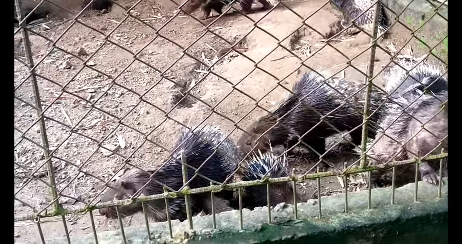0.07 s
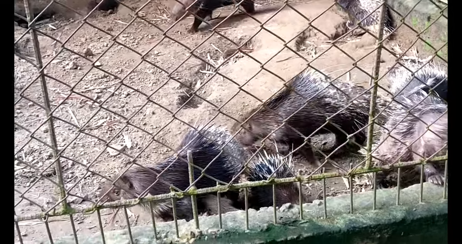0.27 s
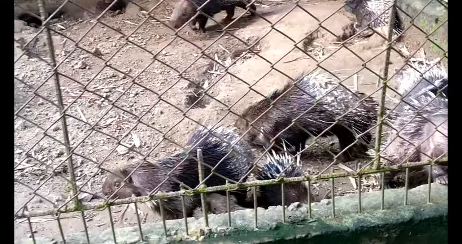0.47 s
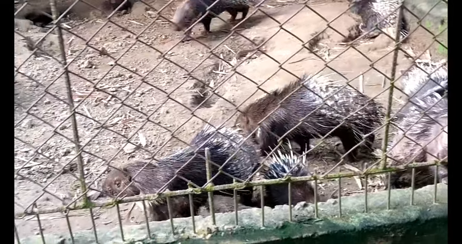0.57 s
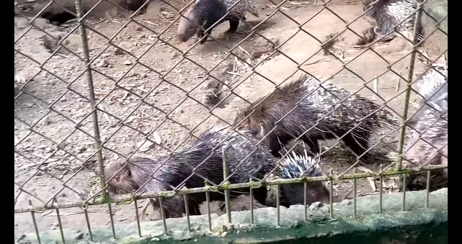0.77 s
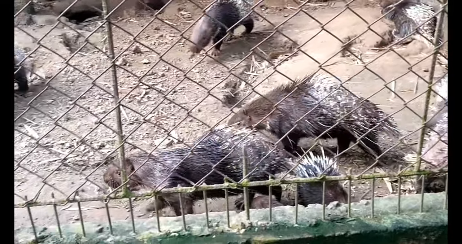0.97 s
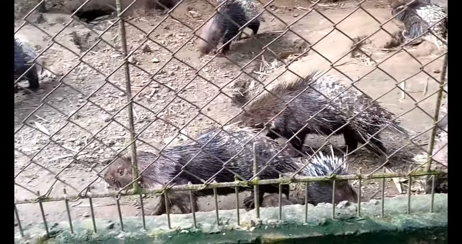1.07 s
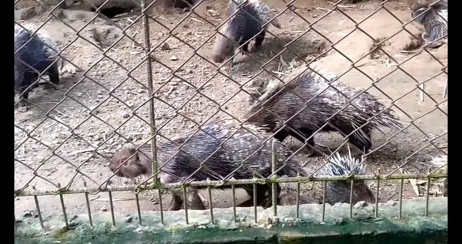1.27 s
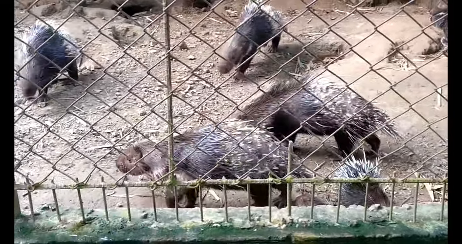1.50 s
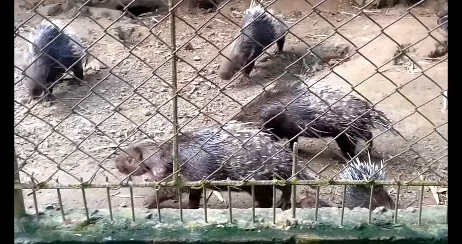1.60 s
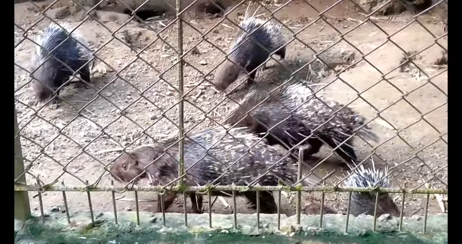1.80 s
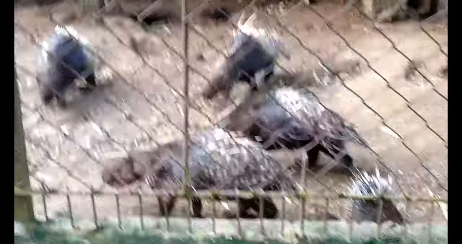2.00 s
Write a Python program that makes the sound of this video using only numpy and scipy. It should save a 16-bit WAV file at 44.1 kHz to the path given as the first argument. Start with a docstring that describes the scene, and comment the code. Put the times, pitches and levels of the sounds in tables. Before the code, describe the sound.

After a brief light rustle, a nasal, raspy porcupine whine dips, rises and falls; crisp quill clacks thicken midway and outlast it, with faint scuffs and thin hiss, heard close in stereo in a quiet outdoor enclosure.

```python
"""A porcupine behind a wire fence gives one long, wavering whine: harmonics and a rasp filtered by throat and nose.
The group shuffles over dry ground: quills rustle and clack, as noise in contact envelopes, coloured by their ring.
A few feet scuff soil and snap litter (decaying noise bursts); a thin high hiss of narrow-band noise hangs above.
Low noise and a faint far drone make the quiet yard. The left microphone gets more treble than the right."""
import sys
import numpy as np
from scipy import signal
from scipy.fft import rfft, irfft
from scipy.io import wavfile
from scipy.ndimage import uniform_filter1d

SR = 44100
rng = np.random.default_rng(int(sys.argv[2]) if len(sys.argv) > 2 else 0)


def unload_audio(sound):
    """Save the sound as a 16-bit wav file, at the path given as the first command line argument."""
    columns = np.transpose(np.atleast_2d(sound))
    # keep every value between -1 and 1, then stretch to whole-number steps
    steps = np.round(np.clip(columns, -1, 1) * 32767)
    wavfile.write(sys.argv[1], SR, steps.astype(np.int16))


N = 90404


def undb(db):
    """Logarithmic level: 20 dB is a factor of ten in amplitude."""
    return 10 ** (np.asarray(db) / 20)


def unit(x):
    """Normalisation to a root-mean-square value of 1."""
    return x / np.sqrt(np.mean(x ** 2))


def noise():
    """White noise: equal power at all frequencies."""
    return rng.standard_normal(N)


def curve(table, axis=1):
    """Linear interpolation of one table column in time."""
    rows = np.array(table)
    return np.interp(np.arange(N) / SR, rows[:, 0], rows[:, axis])


def walk(hz):
    """Band-limited random modulation: noise low-passed at hz, with RMS 1."""
    low_pass = signal.butter(2, hz, fs=SR, output="sos")
    return unit(signal.sosfilt(low_pass, noise()))


def colour(x, points, keep_level=False):
    """Minimum-phase filtering: the gain through (f/Hz, level/dB) points fixes a causal response."""
    hz, db = np.array(points).T
    size = 2048
    bins_hz = np.maximum(np.fft.rfftfreq(size, 1 / SR), 1)
    gain = undb(np.interp(np.log(bins_hz), np.log(hz), db))
    if keep_level:
        gain = unit(gain)  # white noise then keeps its power
    # folding the cepstrum onto positive time gives minimum phase
    cepstrum = irfft(np.log(gain))
    cepstrum[1:size // 2] *= 2
    cepstrum[size // 2 + 1:] = 0
    response = irfft(np.exp(rfft(cepstrum)))
    return signal.fftconvolve(x, response)[:N]


def strikes(rows, contact_s=0.00098):
    """Impact excitation: a linear rise over the contact time up to the peak, then exponential decay."""
    t = np.arange(N) / SR
    total = 0
    for at, db, decay in rows:
        rise = np.clip((t - at) / contact_s + 1, 0, 1)
        fall = np.exp(-np.maximum(t - at, 0) / decay)
        total = total + undb(db) * rise * fall
    return total


# spectral shape of the yard's background noise: f/Hz, relative level/dB
YARD_SPECTRUM = [(25, -43), (60, -12), (100, 4), (160, -3), (240, -10), (400, -32), (600, -4), (900, -8.5),
                 (2000, -25.5), (5000, -16), (14000, -16)]
# faint low drone in the distance: t/s, level/dB
DRONE_LEVEL = [(0, -64.5), (.08, -71.5), (.2, -76.5), (.7, -79), (1.2, -87), (1.56, -71.5), (1.67, -81.5),
               (1.75, -75), (1.85, -77.5), (2.05, -82.5)]
# spectral shape of the far drone: f/Hz, relative level/dB
DRONE_SPECTRUM = [(80, -20), (160, -5), (220, 5.5), (280, -2.5), (360, -13), (600, -22.5), (2000, -65.5)]


def yard(level_db=-76.5, side_db=-13):
    """Diffuse background: mid and weak side noise give high coherence between sides; the drone is common."""
    mid, side = (colour(noise(), YARD_SPECTRUM, True) for _ in range(2))
    drone = undb(curve(DRONE_LEVEL)) * colour(noise(), DRONE_SPECTRUM, True)
    opposite = np.array([[1], [-1]])
    return undb(level_db) * (mid + undb(side_db) * side * opposite) + drone


# hard clacks of quills: t/s, peak level/dB of the envelope, decay/s
CLACKS = [(.0228, -32.5, 0.00083), (.1215, -35, 0.0034), (.382, -23, 0.0022), (.400, -33, 0.0028),
          (.440, -33, .003), (.498, -30.5, 0.0025), (.518, -47, .001), (.5375, -24, 0.0022),
          (.831, -25.5, 0.0034), (.8355, -20.5, 0.0038), (.8395, -30, 0.0049), (.8465, -23, 0.0019),
          (.857, -25.5, 0.0035), (.903, -31, 0.0018), (.930, -36, 0.0014), (.958, -26, 0.0053),
          (.990, -24, 0.0014), (1.016, -35, 0.0019), (1.153, -39, 0.0023), (1.1905, -21.5, 0.0028),
          (1.252, -24, 0.0044), (1.286, -51, .004), (1.3135, -24, 0.0015), (1.324, -24, .005),
          (1.336, -35.5, 0.0064), (1.419, -35.5, 0.0058), (1.500, -24, 0.0024), (1.538, -35, .003),
          (1.5605, -36.5, 0.0013), (1.577, -29, 0.0035), (1.590, -28.5, 0.0035), (1.637, -22.5, 0.0032),
          (1.657, -33.5, 0.0031), (1.689, -34, 0.011), (1.762, -36.5, 0.0086), (1.7972, -27.5, 0.0025),
          (1.845, -40.5, 0.0018), (1.943, -51.5, .005), (1.985, -51, .007), (2.014, -46.5, 0.0042),
          (2.03, -50.5, 0.0054)]
# ring of a quill: f/Hz, relative level/dB
QUILL_RING = [(300, -44.5), (2000, -29), (3000, -19), (3900, -17.5), (5400, -11.5), (6400, -1), (7100, 7),
              (7900, 8), (8900, -5.5), (10500, -14), (14000, -18.5)]
# rustle of the coats before the ground reflection: t/s, level/dB
RUSTLE_LEVEL = [(0, -50.5), (.05, -60), (.10, -46.5), (.19, -53.5), (.33, -52.5), (.40, -46), (.51, -49.5),
                (.60, -56), (.78, -61), (.84, -40), (.97, -42.5), (1.04, -51), (1.12, -40), (1.24, -33.5),
                (1.34, -40), (1.38, -41), (1.48, -46), (1.535, -49), (1.61, -42.5), (1.66, -42),
                (1.75, -47), (1.84, -47), (1.93, -63.5), (2.05, -57)]
# spectral shape of the rustle: f/Hz, relative level/dB
RUSTLE_SPECTRUM = [(300, -57), (1000, -32), (2200, -33), (3900, -8), (5500, -7.5), (7200, 5), (8300, 0.5),
                   (10000, -8), (12000, -11.5), (14000, -15)]
GRAINS_PER_S, GRAIN_SPREAD_DB, GRAIN_DECAY_S = 1400, -1.5, 0.00055
CLUMP_DB, CLUMP_HZ = 1, 110  # random swell that gathers the small touches in clumps
BOUNCE_S, BOUNCE_DB = 0.003, -5.5  # reflection from the ground


def quills():
    """Granular excitation: random touches and hard clacks ring the quills, in two views of the same contacts."""
    touched = rng.random(N) < GRAINS_PER_S / SR
    spread = np.minimum(rng.exponential(size=N), 4)
    touches = touched * undb(GRAIN_SPREAD_DB * spread)
    touches = touches * undb(CLUMP_DB * walk(CLUMP_HZ))
    # a one-pole filter gives each touch its exponential decay
    pole = np.exp(-1 / (GRAIN_DECAY_S * SR))
    grains = unit(signal.lfilter([1], [1, -pole], touches)) * undb(curve(RUSTLE_LEVEL))
    clacks = strikes(CLACKS)
    t = np.arange(N) / SR
    views = []
    for _ in range(2):
        rustle = colour(grains * noise(), RUSTLE_SPECTRUM, True)
        direct = rustle + colour(clacks * noise(), QUILL_RING, True)
        bounce = np.interp(t - BOUNCE_S, t, direct, left=0)
        views.append(direct + undb(BOUNCE_DB) * bounce)
    return np.array(views)


# thin hiss before its flutter: t/s, level/dB
HISS_LEVEL = [(0, -84), (.2, -51.5), (.38, -45), (.68, -51), (.95, -51), (1.2, -57.5), (1.45, -46),
              (1.56, -56.5), (1.8, -67.5), (2.05, -82.5)]
# spectral shape of the hiss, with its peak near 7 kHz: f/Hz, relative level/dB
HISS_SPECTRUM = [(3000, -20.5), (5600, -29), (6400, -15), (7000, -1), (7700, -7.5), (8500, -42),
                 (10000, -26.5), (14000, -31)]


def hiss(flutter_db=2.5):
    """Narrow-band noise under random amplitude modulation, in two incoherent views with a common level."""
    level = undb(curve(HISS_LEVEL) + flutter_db * walk(120))
    return np.array([colour(level * noise(), HISS_SPECTRUM, True) for _ in range(2)])


# fundamental of the whine before jitter: t/s, f/Hz
PITCH = [(0.22, 837.4), (0.28, 721.4), (0.33, 571.6), (0.348, 593), (0.366, 590), (0.374, 606.4),
         (0.42, 495), (0.456, 489), (0.46, 483), (0.47, 416.1), (0.484, 347.9), (0.488, 346.6), (0.5, 375),
         (0.538, 445.4), (0.542, 450), (0.554, 434.7), (0.582, 395), (0.586, 388), (0.618, 451.6),
         (0.64, 493), (0.672, 493.3), (0.704, 561), (0.74, 609.7), (0.808, 661.3), (0.838, 637.7),
         (0.88, 599.4), (0.92, 633.6), (0.93, 640), (0.952, 584.6), (0.97, 558), (0.978, 520),
         (1.006, 403.0), (1.042, 476), (1.056, 502), (1.1, 560.3), (1.146, 530.4), (1.178, 551),
         (1.208, 529.6), (1.29, 532.7), (1.318, 464.9), (1.35, 383), (1.398, 364.4), (1.448, 387.7),
         (1.47, 367.7), (1.48, 337.7), (1.51, 233.6)]
# vocal effort before the throat: t/s, relative level/dB, tilt/(dB per octave of harmonics), nasal ring level/dB
EFFORT = [(0.228, -31.0, 1, -8), (0.255, -27.5, 0.2, -0.5), (0.3, -29.5, -1.7, 7.0),
          (0.33, -37.5, -0.5, -3), (0.37, -36, -3.6, 6), (0.42, -37.5, -2, 8), (0.47, -36, -1.9, -2),
          (0.51, -38, -1.9, 4), (0.545, -36, -5.5, -1.0), (0.585, -39, 0, -6), (0.63, -36, -6, 2),
          (0.69, -41.0, -3.5, 1), (0.75, -33.5, -0.5, -3.5), (0.82, -30.5, 1.2, 6.0), (0.88, -33, -0.8, 14),
          (0.935, -30.5, -3.2, 15.5), (0.975, -41, 1, -11), (1.0, -36, -1.1, -30), (1.06, -38.0, -1.5, -13),
          (1.15, -39, 0.5, -14), (1.25, -37, 2.6, 6.5), (1.32, -37.0, 1.95, 1.5), (1.39, -40.5, -0.56, 16),
          (1.45, -38, 0.4, -2), (1.495, -36.5, -5, 11)]
# hoarseness, scaling both roughness and rasp: t/s, relative level/dB
HOARSENESS = [(.22, -7), (.30, 2), (.45, 1), (.58, -9), (.74, -9), (.86, -3.5), (.96, 10), (1.04, -7),
              (1.15, 7), (1.27, 9), (1.34, 0.5), (1.41, -12), (1.50, 14)]
# resonances of throat and nose: f/Hz, level/dB
THROAT = [(120, -5.5), (300.0, -3), (400.0, 1), (550.0, -9), (700.0, -8.5), (820.0, 2.5), (1080.0, -0.5),
          (1350.0, -9.5), (1600.0, -5), (1900.0, -8.5), (2300.0, -11), (2620.0, -11.5), (3100.0, -23.5),
          (3800.0, -20), (5000.0, -27.5), (7000.0, -21), (10000, -65)]
# spectral shape of rasp and pop: f/Hz, relative level/dB
RASP_SPECTRUM = [(200, -64), (600, -32), (950, 3), (1400, -2), (1900, 2), (2700, -4), (3400, -12.5),
                 (6000, -10.5), (10000, -45)]
JITTER, SHIMMER_DB, RASP_DB = 0.00294, 0.54, -17  # jitter as a fraction of the fundamental
NASAL_HZ, NASAL_WIDTH_HZ = 2843, 366
CRY_START_S, CRY_END_S, ATTACK_S, RELEASE_S = .2205, 1.511, 0.0023, 0.015
CATCH_S, CATCH_DB, CATCH_DECAY_S = .215, -36.5, 0.0036  # a small pop just before the tone
WANDER_DB = 2  # slow drift of the upper harmonics
BLUR_DB, BLUR_HZ = -3.5, 2800  # roughness of the harmonics and where it sets in


def whine():
    """Source-filter voice: harmonics, rougher with frequency, and a rasp pulsing each cycle, shaped by resonances."""
    t = np.arange(N) / SR
    hz = uniform_filter1d(curve(PITCH), size=400) * (1 + JITTER * walk(77))
    phase = 2 * np.pi * np.cumsum(hz) / SR
    tilt_db, nasal_db = curve(EFFORT, axis=2), curve(EFFORT, axis=3)
    hoarse = undb(curve(HOARSENESS))
    tone = 0
    for k in np.arange(1, 15):  # harmonic number
        nasal = np.exp(-((k * hz - NASAL_HZ) / NASAL_WIDTH_HZ) ** 2)
        db = tilt_db * np.log2(k) + nasal_db * nasal
        # the fundamental does not drift; from the fourth harmonic up the drift is full
        drift = undb(WANDER_DB * min(np.log2(k) / 2, 1) * walk(7.9))
        blur = hoarse * undb(BLUR_DB) / (1 + (BLUR_HZ / (k * hz)) ** 4)
        # complex noise blurs amplitude and phase; the divisor keeps the mean power
        rough = (1 + blur * (walk(87) + 1j * walk(130))) / np.sqrt(1 + 2 * blur ** 2)
        tone = tone + undb(db) * drift * np.real(rough * np.exp(1j * k * phase))
    attack = np.clip((t - CRY_START_S) / ATTACK_S, 0, 1)
    release = np.clip((CRY_END_S - t) / RELEASE_S, 0, 1)
    level = attack * release * undb(curve(EFFORT) + SHIMMER_DB * walk(46))
    cycle_pulse = (.5 + .5 * np.cos(phase)) ** 2
    rasp = level * hoarse * undb(RASP_DB + tilt_db) * cycle_pulse
    pop = strikes([(CATCH_S, CATCH_DB, CATCH_DECAY_S)])
    return colour(tone * level, THROAT) + colour((rasp + pop) * noise(), RASP_SPECTRUM, True)


# scuffs of feet before the high-pass: t/s, peak level/dB of the envelope, decay/s
SCUFFS = [(.381, -44.5, 0.0068), (.439, -39.5, 0.0055), (.538, -40, 0.0071), (.955, -37, 0.0089),
          (1.499, -41.5, 0.012), (1.559, -58, 0.0081), (1.634, -63.5, 0.0067)]
# spectral shape of a scuff on soil before the high-pass: f/Hz, relative level/dB
SOIL_SPECTRUM = [(80, -36), (160, -13), (260, -6), (500, -8), (1000, -9), (2000, -9.5), (3500, -7.5),
                 (7000, -30)]
# sharp snaps of dry litter underfoot: t/s, peak level/dB of the envelope, decay/s
SNAPS = [(.440, -36.5, .002), (.538, -47, 0.0014), (.958, -35.5, 0.00099), (1.501, -48, 0.0015),
         (1.561, -41.5, 0.0015), (1.7975, -35.5, 0.00089)]
# ring of a snap: f/Hz, relative level/dB
LITTER_RING = [(500, -55), (2200, -21), (2900, -2.5), (4000, 6), (5200, 1), (7000, -18), (14000, -19)]


def feet():
    """Friction and fracture as noise bursts: scuffs on dry soil, with little bass, and snaps of litter."""
    scuffs = colour(strikes(SCUFFS) * noise(), SOIL_SPECTRUM, True)
    snaps = colour(strikes(SNAPS) * noise(), LITTER_RING, True)
    high_pass = signal.butter(3, 190, "high", fs=SR, output="sos")
    return signal.sosfilt(high_pass, scuffs) + snaps


def air(x, t60_s=0.22, level_db=-24.5):
    """Reverberation by convolution: weak scattered echoes of the enclosure decay exponentially."""
    t = np.arange(N) / SR
    tail = noise() * undb(-60 * t / t60_s) * (t > .004)  # no echo in the first 4 ms
    tail = tail / np.linalg.norm(tail)
    return undb(level_db) * signal.fftconvolve(x, tail)[:N]


# filter of the right microphone against the left: f/Hz, level/dB
RIGHT_FILTER = [(100, -4.5), (400, 1.5), (1100, -0.7), (2500, -0.83), (4500, -1.5), (6500, -1.5),
                (7300, -4.5), (8200, -12), (10000, -8), (13000, -16.5)]
RIGHT_APART = 0.63  # power share of quills and hiss that differs at the right, before its filter


def scene():
    """Superposition at two microphones: a shared near sound, partly incoherent rattle, echoes and background."""
    near = whine() + feet()
    rattle, other = quills() + hiss()
    left = near + rattle
    right_rattle = np.sqrt(1 - RIGHT_APART) * rattle + np.sqrt(RIGHT_APART) * other
    right = colour(near + right_rattle, RIGHT_FILTER)
    return np.array([x + air(x) for x in (left, right)]) + yard()


def record(dry, top_hz=14250):
    """Band limitation: a steep elliptic low-pass cuts the top."""
    low_pass = signal.ellip(8, .2, 70, top_hz, fs=SR, output="sos")
    return signal.sosfilt(low_pass, dry)


dry = scene()
out = record(dry)
unload_audio(out)
```